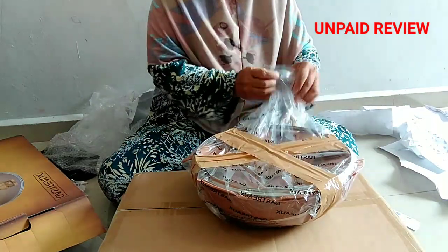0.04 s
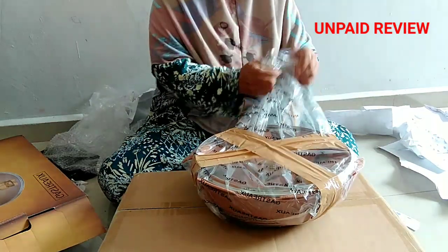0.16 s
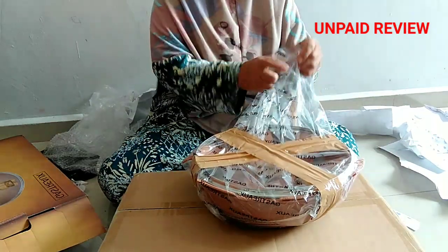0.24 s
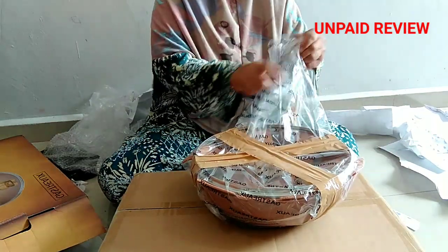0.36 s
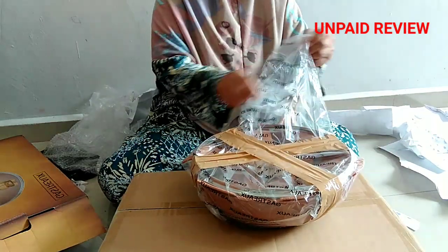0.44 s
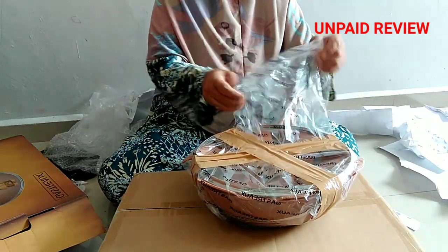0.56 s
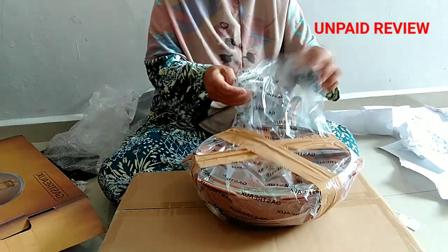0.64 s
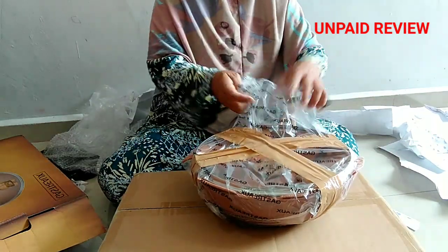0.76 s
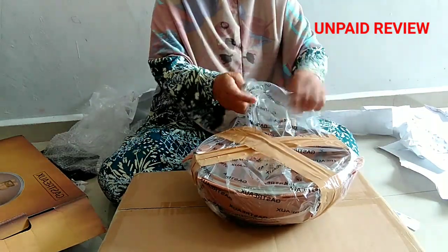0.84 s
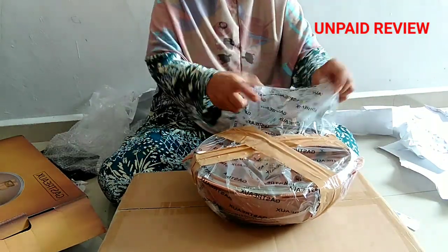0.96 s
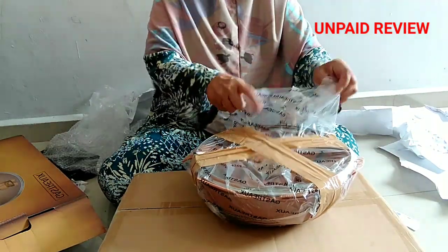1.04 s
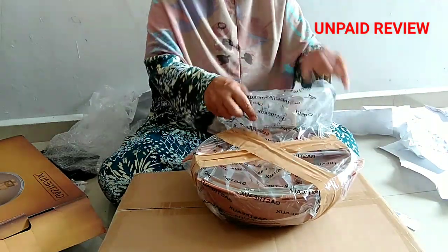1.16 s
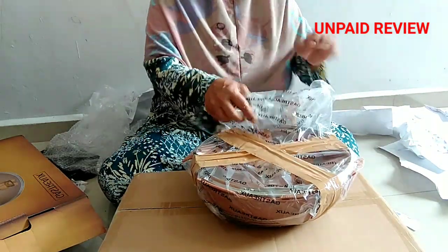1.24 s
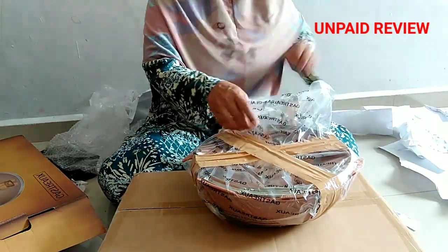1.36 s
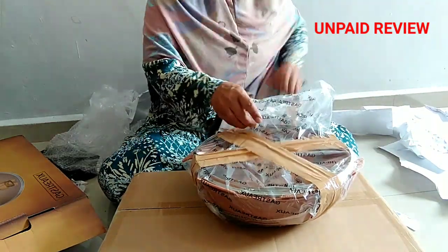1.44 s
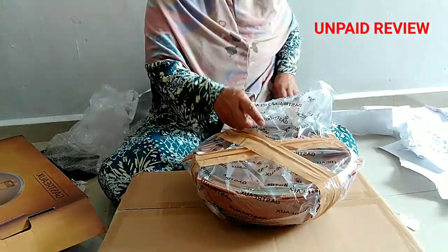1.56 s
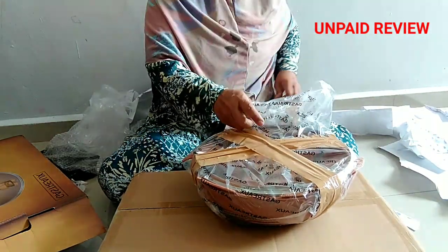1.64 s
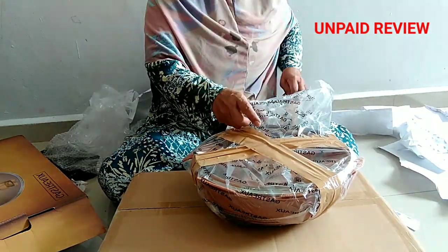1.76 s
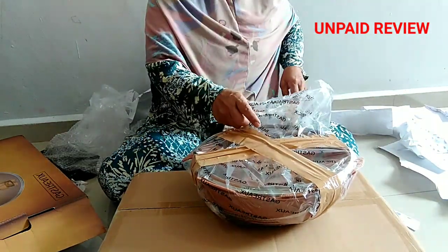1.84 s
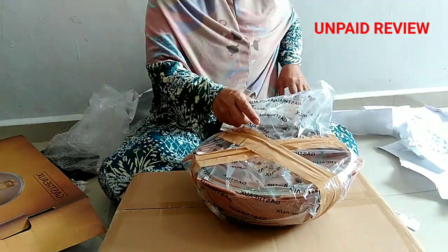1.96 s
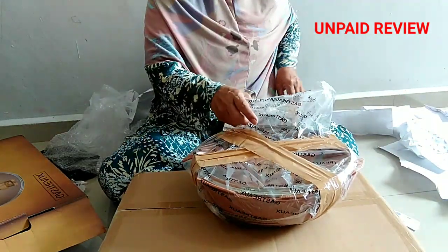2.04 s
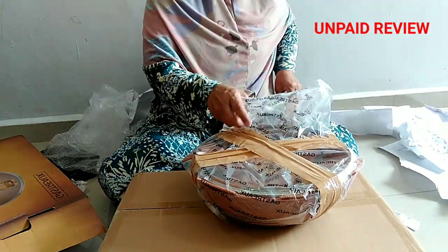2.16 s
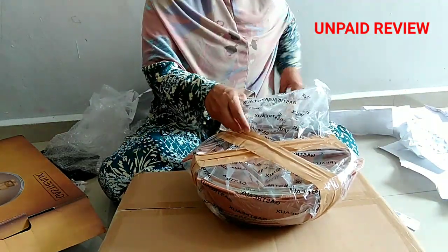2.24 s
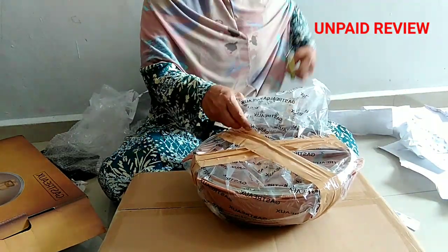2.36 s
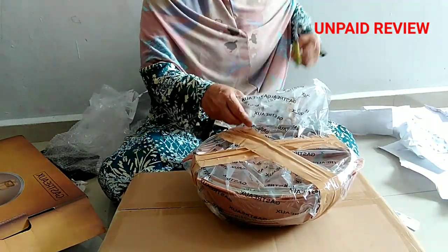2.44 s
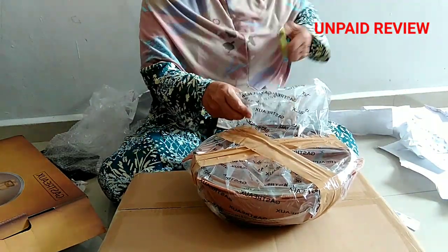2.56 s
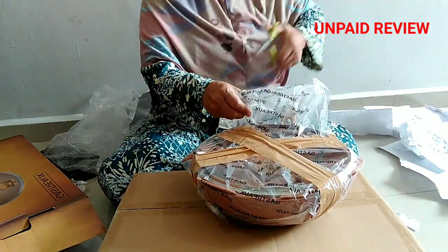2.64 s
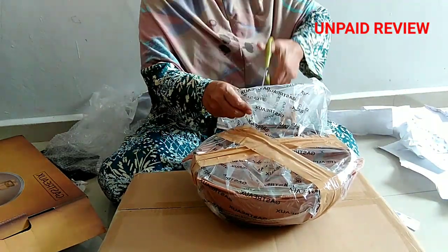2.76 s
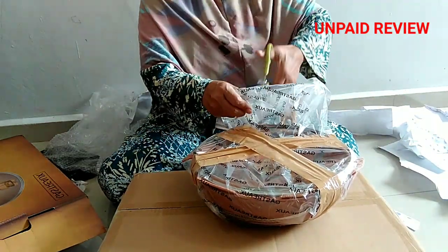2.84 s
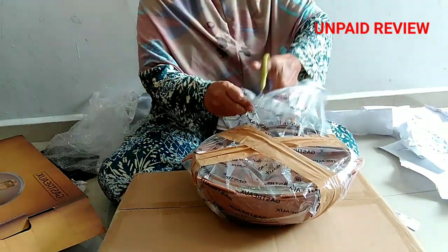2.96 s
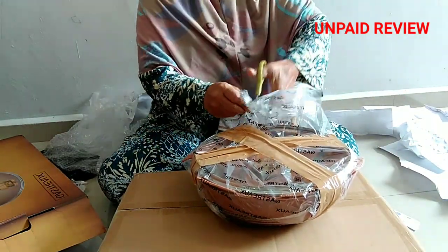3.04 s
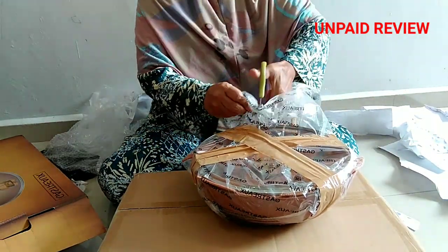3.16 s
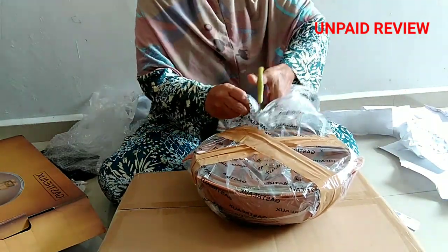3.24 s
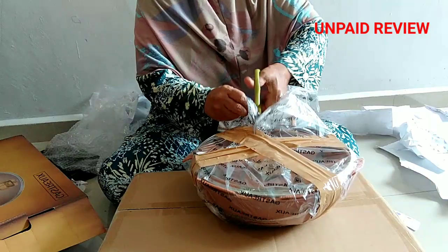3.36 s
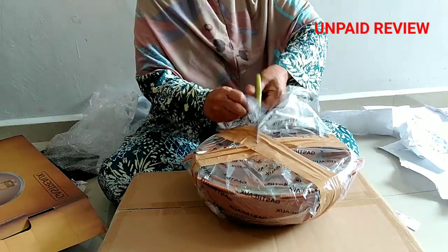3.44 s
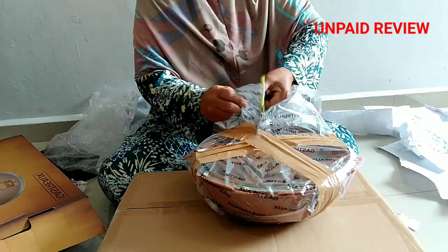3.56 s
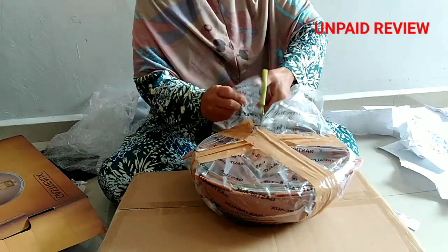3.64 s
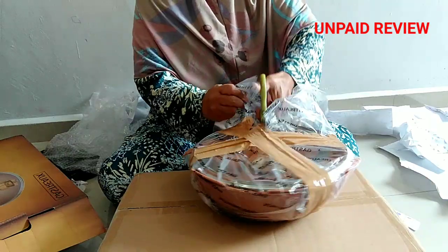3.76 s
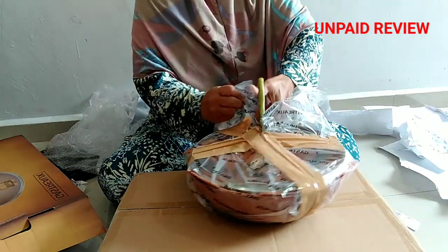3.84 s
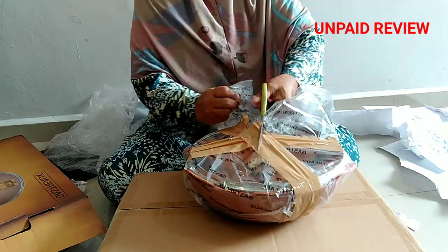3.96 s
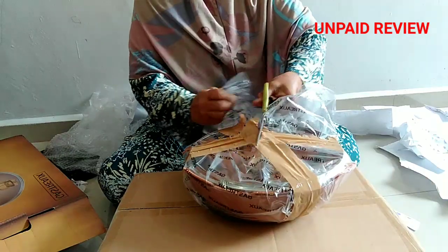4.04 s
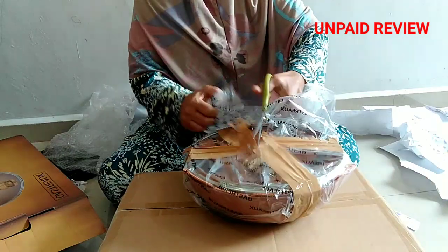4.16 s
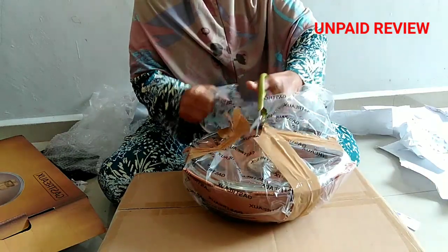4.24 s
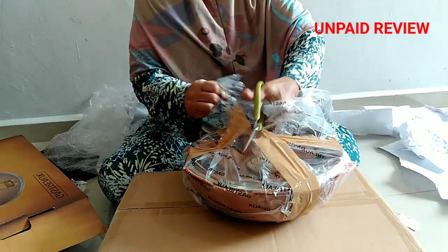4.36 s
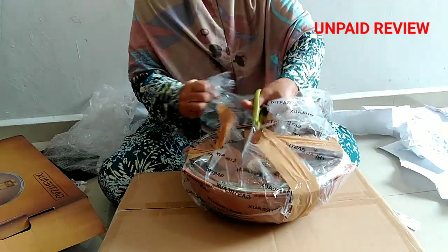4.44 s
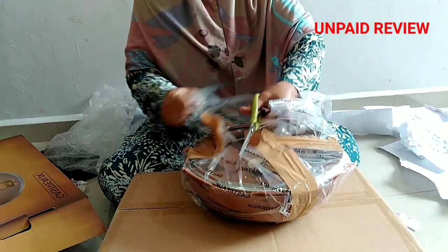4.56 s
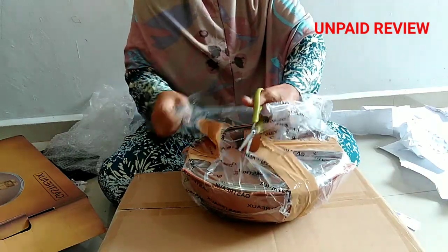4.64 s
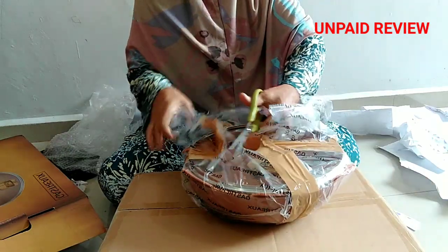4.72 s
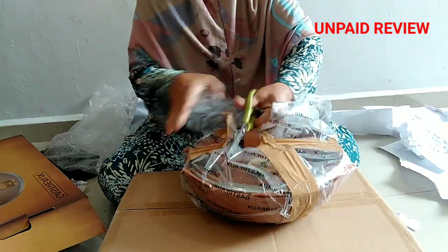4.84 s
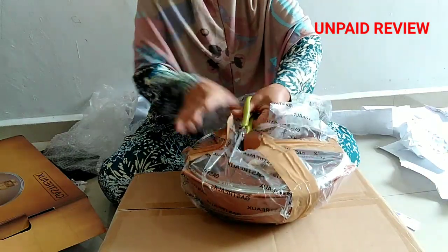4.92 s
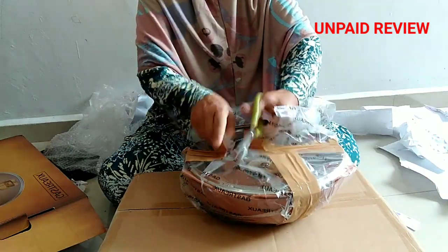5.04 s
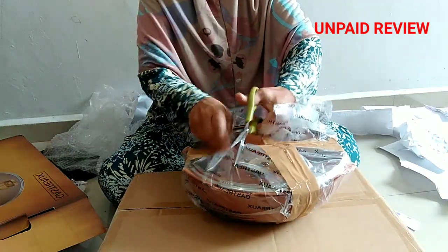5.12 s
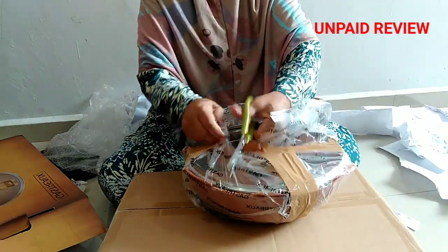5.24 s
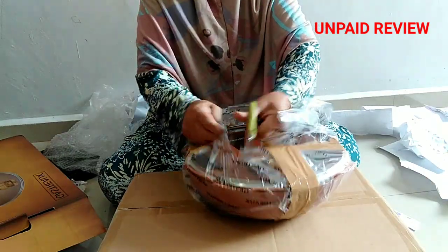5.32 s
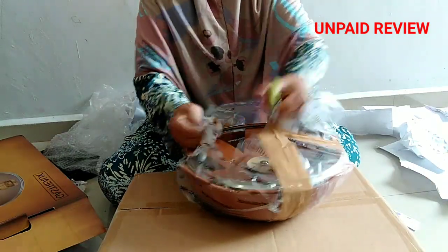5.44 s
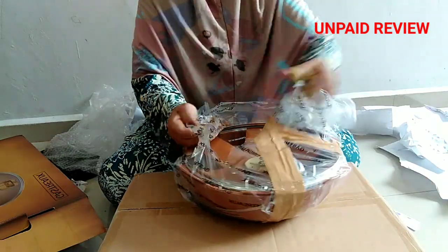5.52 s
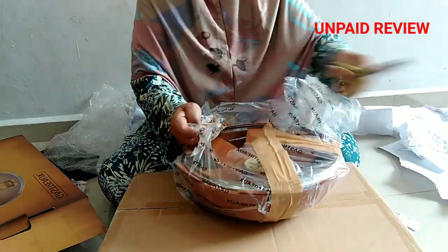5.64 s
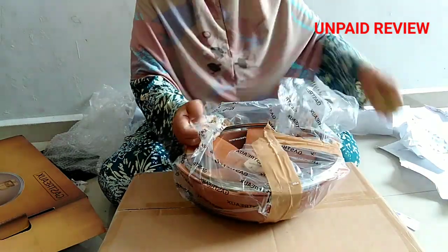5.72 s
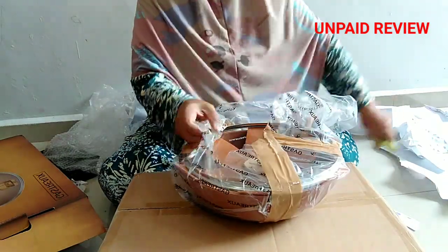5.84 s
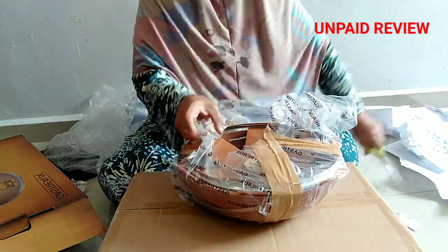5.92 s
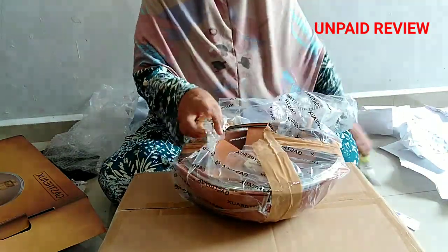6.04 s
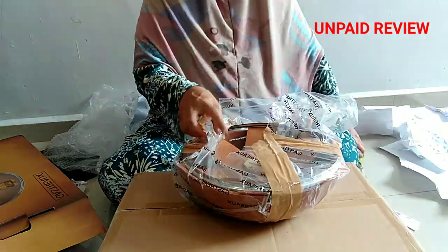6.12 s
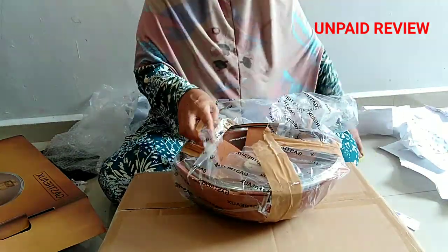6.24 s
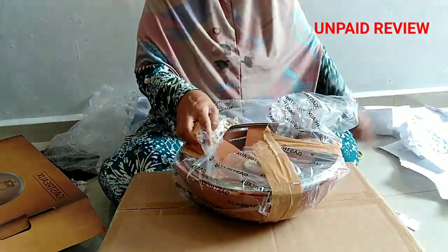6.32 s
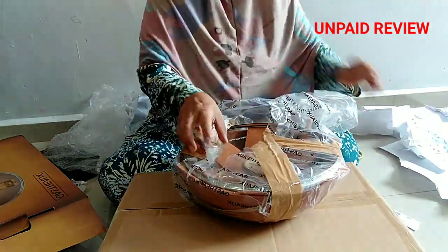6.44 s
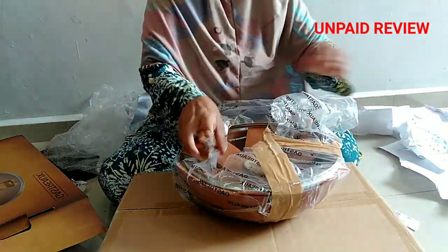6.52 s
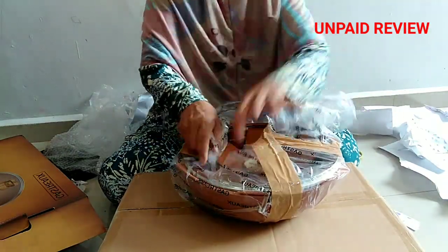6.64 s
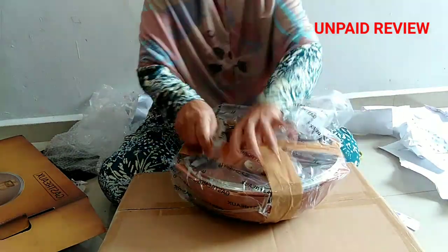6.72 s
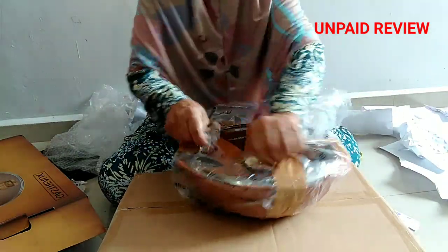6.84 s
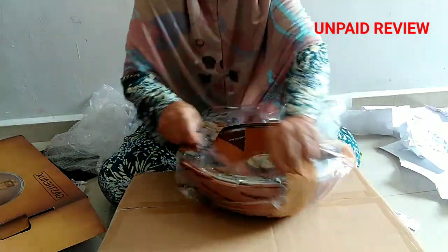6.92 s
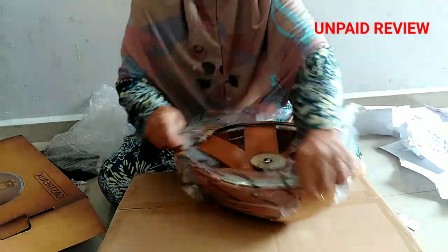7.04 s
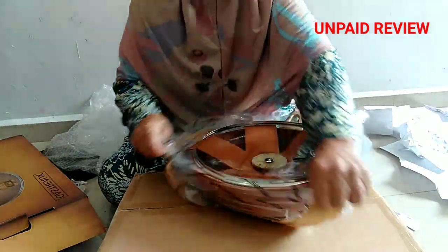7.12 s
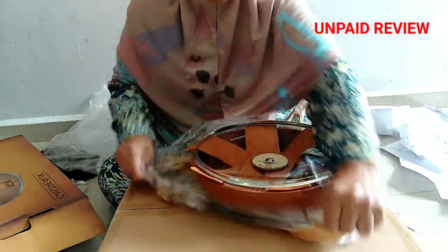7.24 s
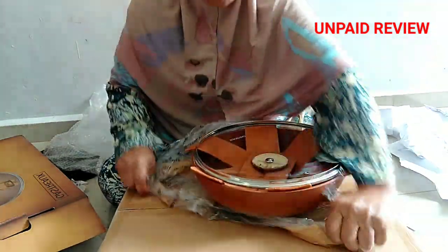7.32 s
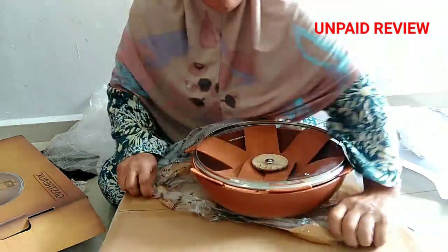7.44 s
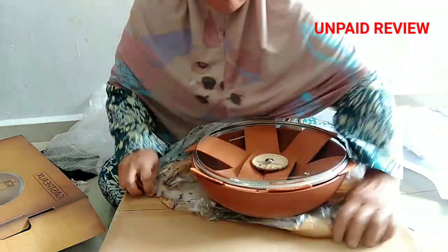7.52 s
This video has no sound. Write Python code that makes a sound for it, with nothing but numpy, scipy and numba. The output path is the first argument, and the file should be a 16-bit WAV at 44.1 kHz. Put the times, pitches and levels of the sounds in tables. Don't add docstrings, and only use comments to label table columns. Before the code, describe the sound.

In a bare, echoing tiled room, thin plastic wrap is tugged in bright crackling bursts, then held almost still with tiny ticks. Cutting brings uneven crunches, sharp snaps and raps on a pot lid. Scissors clink down on the tiles, and the wrap is pulled away in a loud rustle over hollow cardboard bumps. A phone listens a metre away.

```python
import sys
import numpy as np
from scipy import signal
from scipy.fft import rfft, irfft, next_fast_len
from scipy.io import wavfile
from scipy.ndimage import uniform_filter1d
from numba import njit

SR = 44100
rng = np.random.default_rng(int(sys.argv[2]) if len(sys.argv) > 2 else 0)


def store_wav(level_fs):
    pcm = np.round(np.clip(np.atleast_2d(level_fs), -1, 1) * 32767)
    wavfile.write(sys.argv[1], SR, pcm.T.astype(np.int16))


N = 334702

# frequency in Hz, level in dB per Hz.
CREASE_COLOUR = [(1470, -24.5), (2500, -12.5), (3830, -5.5), (4170, -5), (5870, -7), (8200, 1.5),
                 (8730, -2), (13700, -24.5), (14900, -23.5), (16000, -47)]


def undb(db):
    return 10 ** (np.asarray(db) / 20)


def unit(x):
    return x / np.sqrt(np.mean(x ** 2))


def on_log(table, hz):
    f, db = np.transpose(table)
    return np.interp(np.log(hz + 1), np.log(f), db)


def colour(x, table):
    gain_db = np.maximum(on_log(table, np.fft.rfftfreq(4096, 1 / SR)), -70)
    cepstrum = irfft(np.log(undb(gain_db)))
    cepstrum[1:2048] *= 2
    cepstrum[2049:] = 0
    response = irfft(np.exp(rfft(cepstrum)))[:2048]
    return signal.fftconvolve(x, response)[:len(x)]


def band(x, lo_hz, hi_hz):
    return signal.sosfilt(signal.butter(2, [lo_hz, hi_hz], "band", fs=SR, output="sos"), x)


@njit
def resonate(x, hz, width):
    y, b, l = np.empty(len(x)), 0., 0.
    for i in range(len(x)):
        g, k = np.tan(np.pi * hz[i] / SR), width / hz[i]
        v = (b + g * (x[i] - l)) / (1 + g * (g + k))
        b, l, y[i] = 2 * v - b, l + 2 * g * v, k * v
    return y


def walk(rate):
    k = int(SR / rate)
    held = np.repeat(rng.standard_normal(N // k + 1), k)[:N]
    return 1.44 * uniform_filter1d(held, k)


def place(seconds, sounds):
    out = np.zeros(N + sounds.shape[1])
    starts = (np.asarray(seconds) * SR).astype(int)
    np.add.at(out, starts[:, None] + np.arange(sounds.shape[1]), sounds)
    return out[:N]


def film(fine_db, medium_db, large_db, box_db, box_hz):
    # share of box pitch, width in Hz, level in dB.
    box_modes = [(0.99, 52, 2.5), (0.634, 70, -9.5), (1.47, 100, -9.5)]
    runs, box_hz = undb(1.97 * walk(30)), np.clip(box_hz, 190, 420)
    flip_rate = np.clip(1500 * undb(0.64 * (fine_db + 35)), 100, 6000)
    flips = runs * crackle(flip_rate, spread_db=2.0, tau_s=0.00045)
    heavy = 0.73 * flips + 0.67 * runs * crackle(500, spread_db=3.0, tau_s=0.0019)
    patch_hz = np.clip(4200 * undb(1.97 * walk(25)), 2000, 6000)
    patch = unit(resonate(flips, patch_hz, 980.0))
    fine = unit(colour(band(flips + 0.34 * patch, 3830, 22000), CREASE_COLOUR))
    medium = unit(band(heavy, 1369, 2975))
    large = unit(band(band(heavy, 640, 1880), 424, 3800))
    wrap = undb(fine_db - 3.5) * fine + undb(medium_db) * medium + undb(large_db) * large

    push = crackle(400, spread_db=2.0, tau_s=0.0024)
    hollow = sum(undb(db) * unit(resonate(push, share * box_hz, 1. * width))
                 for share, width, db in box_modes)
    return wrap, undb(box_db - 2.0) * unit(band(hollow, 110, 680))


def crackle(rate, spread_db, tau_s):
    when, size = rng.random((2, N))
    loudness = undb(np.minimum(-spread_db * np.log(size + 1e-9), 24))
    flips = (when < rate / SR) * loudness / np.sqrt(rate)
    decaying = signal.lfilter([1], [1, -np.exp(-1 / (tau_s * SR))], flips)
    return unit(decaying * rng.standard_normal(N))


def hands():
    # peak time in seconds, fine creases in dB,
    # seconds per 10 dB rise, seconds per 10 dB fall, large folds minus fine in dB.
    tugs = [(0.0, -39, .02, 0.2, -20), (.15, -33.5, 0.1, 0.38, -18), (.27, -30, 0.13, .12, -13.5),
            (.39, -33, .06, .2, -14.5), (.56, -29.5, .08, 0.27, -16.5), (.9, -38, 0.06, 0.3, -20),
            (1.02, -36.5, 0.05, 0.21, -17), (1.099, -27, 0.0258, .07, -14.5), (1.17, -39, 0.03, .22, -14),
            (1.6, -39.5, 0.03, 0.15, -19.5), (1.709, -38, 0.04, 0.1248, -16),
            (1.865, -39.5, .07, 0.09, -28), (1.99, -49, 0.1, 0.1, -30), (2.09, -46, 0.1, 0.08, -40)]
    fidgets = [(2.17, -53, .05, .1, -26), (2.3, -57, .05, .03, -26), (2.36, -50, .006, .06, -26),
               (2.43, -52.5, .03, .1, -30), (2.48, -49, .05, 0.078, -21), (2.606, -42.5, .015, 0.065, -25),
               (2.75, -41.5, .01, 0.071, -39.5), (2.88, -56, .04, .05, -30)]
    cuts = [(3.105, -38, .012, .35, -15), (3.3, -34, .055, 0.039, -18), (3.51, -43, .12, 0.18, -17),
            (3.64, -37, .12, .14, -19), (3.77, -38, .01, .17, -16), (3.99, -36, .1, 0.087, -8),
            (4.089, -33.5, .015, 0.28, -8.5), (4.419, -33, 0.11, 0.084, -12),
            (4.57, -36.5, 0.042, 0.12, -12), (4.64, -34, 0.089, 0.19, -7), (4.86, -39.5, .15, 0.33, -15.5),
            (5.08, -41.5, .3, .3, -10.5), (5.26, -33.5, .04, 0.11, -10.5), (5.5, -33.5, .3, .2, -9),
            (5.75, -42, 0.36, 0.21, -18)]
    pulls = [(6.05, -39, .015, 0.11, -24), (6.2, -41, .035, 0.16, -21), (6.3, -46, .2, .2, -24),
             (6.385, -36, .006, 0.024, -18), (6.41, -41, 0.0089, .16, -18), (6.72, -46.5, .3, 0.22, -39),
             (6.87, -39, 0.18, .1, -33), (6.94, -32.5, 0.049, 0.65, -10.5), (7.19, -32, .1, .15, -10),
             (7.36, -33, .1, .3, -11), (7.5, -31, 0.38, .25, -9.5)]
    # start in seconds, level in dB, held seconds, box pitch in Hz.
    presses = [(.14, -61, 0.11, 350), (.27, -54, 0.23, 392), (.6, -50, .04, 288), (.9, -68, .01, 400),
               (1.01, -50, 0.16, 287), (3.65, -54, .01, 300), (3.77, -64, .01, 280), (3.97, -46, .03, 253),
               (4.09, -57.5, 0.13, 257), (4.4, -47, 0.027, 250), (4.63, -44.5, 0.032, 245),
               (4.96, -61, 0.13, 233), (5.25, -50, 0.14, 238), (5.52, -50, .12, 252),
               (6.05, -57.5, 0.057, 263), (6.4, -56, 0.017, 338), (6.931, -44.5, 0.11, 254),
               (7.14, -42.5, 0.16, 255), (7.36, -43, .2, 264)]

    s, db, rise, fall, large = np.transpose(tugs + fidgets + cuts + pulls)
    moves = swells(s, rise, 0, fall)
    medium = -7.5 + .15 * large
    folds = [to_db(moves @ undb(2 * (db + under))) for under in (0, medium, large)]

    s, db, hold, hz = np.transpose(presses)
    press = swells(s, rise_s=0.019, hold_s=hold, fall_s=0.067) * undb(2 * db) + 1e-30
    press_power = press.sum(axis=1)
    pitch = press @ hz / press_power
    box_hz = np.interp(np.arange(N) / SR * 1000, np.arange(len(pitch)), pitch)
    return *folds, to_db(press_power), box_hz


def swells(s, rise_s, hold_s, fall_s):
    late = np.arange(0, N / SR + .002, .001)[:, None] - s
    rising = np.maximum(-late, 0) / np.maximum(rise_s, .004)
    falling = np.maximum(late - hold_s, 0) / np.maximum(fall_s, .01)
    return undb(-20 * (rising + falling))


def to_db(power):
    return np.interp(np.arange(N) / SR * 1000, np.arange(len(power)), 10 * np.log10(power + 1e-10))


def snaps():
    # start in seconds, peak in dB, low pop minus peak in dB.
    tug_snaps = [(0.1548, -19, -26), (0.1994, -17.5, -24), (0.2606, -13.5, -25.5), (0.38, -18, -23),
                 (0.5062, -20, -23), (0.62, -13, -25.5), (0.6714, -18, -25), (0.723, -20, -23),
                 (0.7547, -18, -22), (0.8393, -21, -24), (0.9113, -24, -18), (0.9767, -23, -18.5),
                 (1.0211, -18.5, -23), (1.047, -19, -20), (1.0779, -13.5, -25), (1.097, -11, -22),
                 (1.1056, -12, -22), (1.256, -22, -24), (1.2815, -23.5, -24.5), (1.3014, -25, -22),
                 (1.4287, -28.5, -26), (1.5222, -30, -21), (1.557, -25, -31), (1.5898, -15, -32),
                 (1.6881, -24, -19), (1.8702, -24.5, -16), (1.8877, -21, -31), (1.9807, -22, -37),
                 (2.0582, -39, -22), (2.0584, -20, -37)]
    hold_snaps = [(2.1345, -37, -28), (2.1799, -29, -42), (2.2044, -32, -36), (2.2218, -34, -27),
                  (2.2618, -37, -27), (2.2902, -41, -34), (2.3077, -41, -33), (2.3521, -26.5, -26),
                  (2.4044, -29, -36), (2.4124, -30, -37), (2.4473, -29.5, -34), (2.4744, -34, -22),
                  (2.5092, -35, -23), (2.5262, -35, -19), (2.602, -28, -30), (2.6294, -30, -23),
                  (2.6628, -26, -29), (2.7442, -27.5, -29), (2.7806, -31, -32), (2.8165, -34, -31),
                  (2.8544, -31, -32), (2.8873, -36, -21), (2.9118, -30, -28), (2.9552, -35, -21),
                  (2.9826, -39, -14), (3.0515, -34, -37.5), (3.0749, -28.5, -35), (3.1018, -27, -27)]
    cut_snaps = [(3.1608, -20.5, -25), (3.2481, -21, -16), (3.4162, -25.5, -30), (3.5449, -26, -21),
                 (3.6387, -19, -16.5), (3.7714, -16, -32), (3.8307, -16.5, -21), (3.9515, -19, -18),
                 (3.9739, -11.5, -23), (4.0899, -28, 1), (4.0894, -9.5, -14.5), (4.1171, -18, -18),
                 (4.1849, -14.5, -27), (4.3022, -24, -23), (4.3103, -21, -25), (4.3346, -24, -23.5),
                 (4.369, -23, -21), (4.389, -17, -17), (4.4109, -15, -18), (4.5606, -24.5, -16),
                 (4.594, -13, -24), (4.6197, -15.5, -17), (4.6708, -14.5, -24), (4.9956, -25, -22),
                 (5.1697, -29, -26), (5.1797, -20, -24.5), (5.2326, -23, -21), (5.2535, -23, -18)]
    pull_snaps = [(5.3582, -22, -20), (5.3986, -16, -20), (5.4167, -10, -27), (5.454, -20, -17),
                  (5.5079, -12.5, -8.5), (5.56, -23, -17.5), (5.5967, -24, -13), (5.6954, -22.5, -25),
                  (5.7767, -22.5, -34), (5.8177, -25, -31), (6.0174, -28.5, -36.5), (6.0323, -24.5, -37),
                  (6.0691, -24, -31), (6.085, -23, -22), (6.1704, -21, -34), (6.1943, -19, -33),
                  (6.3484, -25, -25), (6.3782, -15, -35), (6.6408, -29, -35), (6.6725, -31, -32),
                  (6.7393, -29, -34), (6.774, -32, -20), (6.7855, -27, -27), (6.841, -25, -26),
                  (6.9182, -25, -15), (6.9386, -15.5, -24), (6.992, -14.5, -18), (7.0778, -16.5, -24.5),
                  (7.1806, -13, -22), (7.357, -20, -16)]
    s, db, low_db = np.transpose(tug_snaps + hold_snaps + cut_snaps + pull_snaps)
    length = 512
    t, f = np.arange(length) / SR, np.fft.rfftfreq(length, 1 / SR)
    chance = rng.standard_normal((len(s), 2 * length + 2))
    decay_s = 0.00074 * undb(4.0 * chance[:, -2:-1])
    burst = chance[:, :length] * np.exp(-t / decay_s)
    bright_hz = 6500 * undb(5.5 * chance[:, -1:])
    hump_db = 2.9 * np.exp(-(np.log((f + 1) / bright_hz) / 0.38) ** 2)
    lean = undb(on_log(CREASE_COLOUR, f) * 0.96 + hump_db)
    delay = np.exp(-2j * np.pi * f * 24 / SR)
    high = irfft(rfft(burst) * lean * delay)
    low = band(chance[:, length:-2] * np.exp(-t / 0.0026), 790, 1900)
    high = high / np.abs(high).max(axis=1, keepdims=True)
    low = low / np.abs(low).max(axis=1, keepdims=True)
    return place(s, undb(db)[:, None] * (high + undb(low_db)[:, None] * low))


def scissors():
    # start in seconds, level in dB, part that rings (0 tip, 1 blades).
    clinks = [
        (6.195, -29, 0),
        (6.211, -28.5, 0),
        (6.379, -17, 1),
        (6.389, -27.5, 1),
        (6.393, -17, 1),
        (6.401, -21, 1),
        (6.411, -30, 1),
    ]
    # frequency in Hz, level in dB, seconds to fall 60 dB.
    tip_modes = [(9500, -3.5, 0.016), (7240, -3.5, 0.014), (13260, -16, .03), (10700, -12, .01)]
    blade_modes = [(6300, 0, .012), (6800, 0, .012), (7400, -2, .012), (8200, -4, .01), (9700, -8, .01),
                   (10800, -6, .012), (13200, -19, .01), (5400, -16, .008), (2150, -15, .012)]
    t, rows = np.arange(4096) / SR, []
    for _, db, which in clinks:
        modes = np.array([tip_modes, blade_modes][int(which)])
        hz, mode_db, t60 = modes[:, :, None].transpose(1, 0, 2)
        chance = rng.standard_normal(hz.shape)
        strike = undb(mode_db + 1.4 * chance)
        hz = hz * (1 + 0.024 * chance[::-1])
        ring = (strike * np.sin(2 * np.pi * hz * t) * undb(-60 * t / t60)).sum(axis=0)
        chatter = rng.standard_normal(len(t)) * np.exp(-t / 0.0024)
        ringing = signal.fftconvolve(ring, chatter)[:len(t)]
        sound = 0.21 * ringing + 0.93 * band(chatter, 5500, 11000)
        rows.append(undb(db) * band(band(sound, 2400, 14000), 1500, 14500))
    return place([c[0] for c in clinks], np.array(rows))


def knocks():
    # start in seconds, level in dB, pitch in Hz, seconds to fall 60 dB.
    raps = [
        (4.082, -31, 1100, .015),
        (4.091, -25, 950, .025),
        (4.104, -39, 1250, .08),
        (5.507, -27, 1950, .025),
        (4.64, -35, 1450, .03),
    ]
    t, rows = np.arange(4096) / SR, []
    for _, db, hz, t60 in raps:
        burst = rng.standard_normal(len(t)) * undb(-60 * t / t60)
        rows.append(unit(band(burst, hz / 1.3, hz * 1.3)) * undb(db - 12))
    return place([k[0] for k in raps], np.array(rows))


def thuds():
    # start in seconds, level in dB, pitch in Hz.
    bumps = [
        (7.555, -34, 89),
        (5.26, -45.5, 103),
        (3.27, -55, 140),
    ]
    s, db, hz = np.array(bumps)[:, :, None].transpose(1, 0, 2)
    t = np.arange(8192) / SR
    return place(s[:, 0], undb(db) * np.sin(2 * np.pi * hz * t) * t / .012 * np.exp(1 - t / 0.0086))


def room(x, count):
    t60_s, echo_db = 0.54, -3.0
    t, size, wet = np.arange(SR // 2) / SR, next_fast_len(N + SR // 2), 0
    spot = np.arange(N) / SR * 9 % count
    for k in range(count):
        distance = np.abs((spot - k + count / 2) % count - count / 2)
        share = np.cos(np.pi / 2 * np.minimum(distance, 1))
        density = np.clip((t / .03) ** 2, .01, 1)
        noise = rng.standard_normal(len(t)) * (rng.random(len(t)) < density) * (t > .003)
        dull = signal.lfilter([.35], [1, -.65], noise)
        tail = dull * undb(-60 * t / t60_s) + (noise - dull) * undb(-60 * t / (0.72 * t60_s))
        wet = wet + rfft(x * share, size) * rfft(tail / np.sqrt(np.sum(tail ** 2)), size)
    return x + undb(echo_db) * irfft(wet, size)[:N]


def scene():
    wrap, box = film(*hands())
    close, far = box + thuds(), scissors()
    echoing = room(wrap + snaps() + knocks() + far + 0.66 * close, count=4)
    return (echoing + 0.82 * close - 0.1 * far)[None]


def suppress(x, depth_db, hold, steep):
    # frequency in Hz, level in dB per third octave.
    learnt_hum = [(100, -67), (250, -68.5), (480, -60.5), (750, -57.5), (1100, -66), (1500, -60),
                  (1800, -70), (3000, -68.5), (4500, -63), (8000, -65), (13000, -70)]
    f, _, z = signal.stft(x, SR, nperseg=1024, noverlap=768)
    third_octave = .23 * f[:, None] / f[1] * 4 / 3
    power = uniform_filter1d(np.abs(z) ** 2, size=3, axis=0) * third_octave
    recent = signal.lfilter([1 - hold], [1, -hold], power, axis=1)
    ripple_db = 2.6 * unit(uniform_filter1d(rng.standard_normal(len(f)), size=3))
    over = np.abs(recent) / undb(2 * (on_log(learnt_hum, f) + ripple_db))[:, None]
    gain = np.maximum(over ** steep / (1 + over ** steep), undb(depth_db))
    return signal.istft(z * gain, SR, nperseg=1024, noverlap=768)[1][:N]


def air():
    # frequency in Hz, level in dB per Hz.
    hum_colour = [(15, -46), (25, 2.5), (92, 0), (253, -8), (335, -10.5), (524, -10.5), (1300, -16),
                  (1690, -53), (2860, -120)]
    softer_top = hum_colour[:-2] + [(3000, -38), (16000, -60)]
    hum = undb(-74.5) * unit(colour(rng.standard_normal(N), softer_top))
    return band(hum, 35, 19000)


def roll_off(x):
    return signal.sosfilt(signal.butter(12, 16660, fs=SR, output="sos"), x)


def record(dry):
    hum = air()
    cleaned = suppress(band(dry[0], 81, 19000), depth_db=-38, hold=0.75, steep=1.8)
    return roll_off((cleaned + hum)[None])


dry = scene()
out = record(dry)
store_wav(out)
```